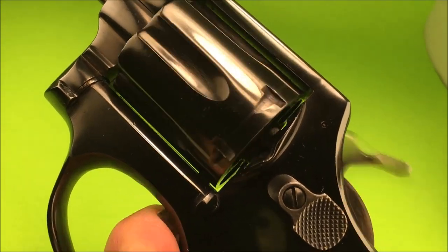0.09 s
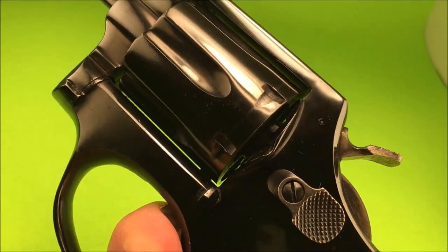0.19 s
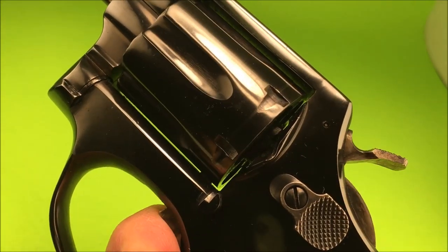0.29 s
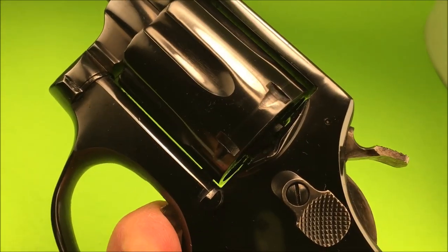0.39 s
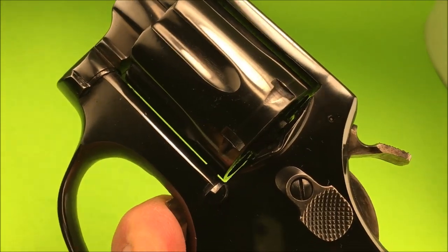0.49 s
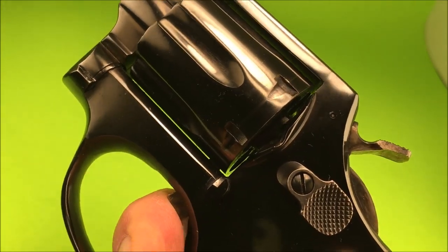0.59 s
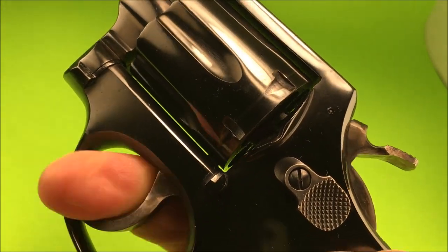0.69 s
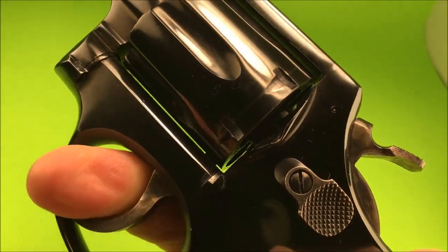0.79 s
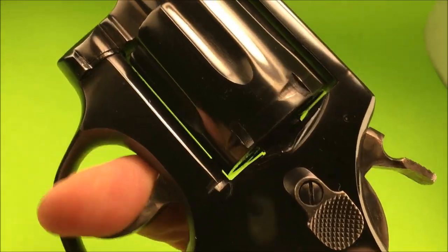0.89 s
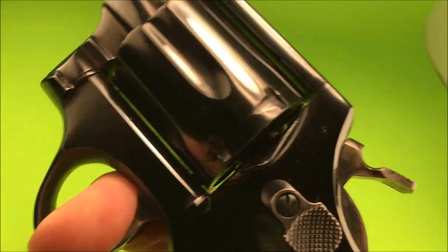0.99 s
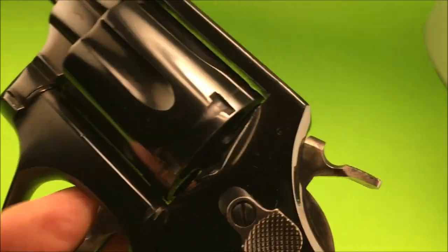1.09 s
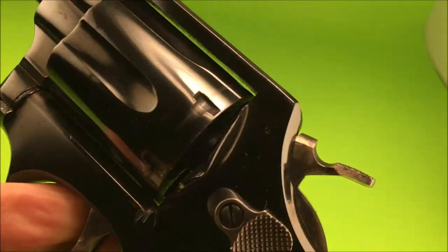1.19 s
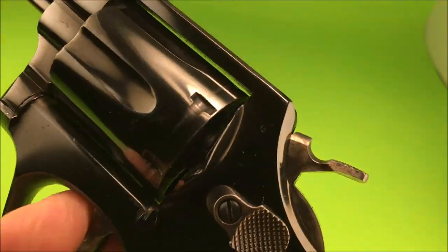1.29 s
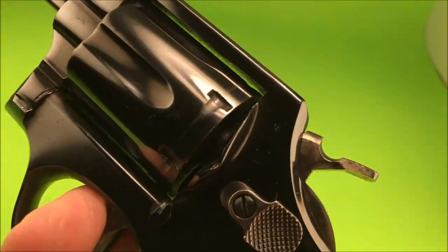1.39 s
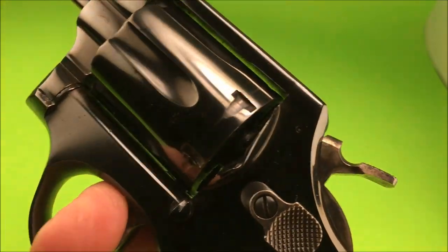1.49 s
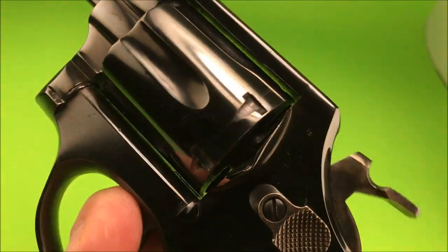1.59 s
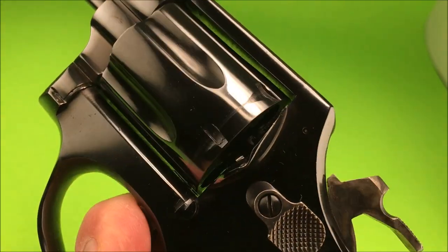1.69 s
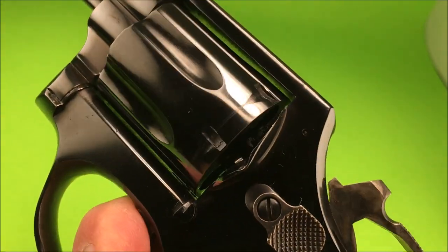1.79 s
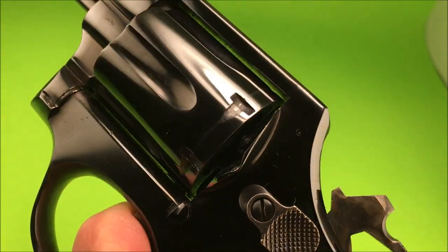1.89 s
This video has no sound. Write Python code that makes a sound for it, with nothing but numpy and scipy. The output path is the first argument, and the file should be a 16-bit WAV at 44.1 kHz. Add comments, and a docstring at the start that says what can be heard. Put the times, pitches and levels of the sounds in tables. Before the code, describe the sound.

A revolver handled close up in a small, quiet room with faint low rumble. A tiny tick, then at 0.2 s the hammer falls: a fast, very loud steel clatter with a short thump and thin hissy shimmer. Soft sliding follows; around 0.75-0.8 s the trigger snaps forward sharply. Light ticks come near 1.0 and 1.2 s, with a small clink, then near quiet, and crisp locking clicks at 1.7 s.

```python
"""A low steady rumble and one faint tick come first, in a small, quiet room; then a revolver is worked by hand.
After a brief slide the hammer falls with a clatter, a thump and a thin shimmer, and the trigger snaps forward.
A slow pull then slides the action, turns the cylinder and locks it with light ticks.
Contacts are decaying noise with frame modes, slides are gated grainy noise, thumps are damped sines.
The shimmer is narrow noise bands, the room a diffuse tail; the recorder's gain ducks after loud blows."""
import sys
import numpy as np
from scipy import signal
from scipy.fft import irfft
from scipy.io import wavfile
from scipy.ndimage import uniform_filter1d

SR = 44100
rng = np.random.default_rng(int(sys.argv[2]) if len(sys.argv) > 2 else 0)


def transcribe(u):
    """Save the signal u as a 16-bit wav file named by the first command-line argument.

    u: samples, shape (n,) or (channels, n), limited to [-1, 1]; the rate is SR.
    q: integer samples, one column per channel.
    """
    v = np.clip(np.atleast_2d(u).T, -1, 1)
    q = np.round(v * 32767).astype(np.int16)
    wavfile.write(sys.argv[1], SR, q)


N = 85995  # length in samples

# Steady low rumble, spectrum: pitch_hz, level_db
AIR_COLOUR = [(15, -31), (25, 0.5), (108, 0), (206, -3), (317, -12), (394, -10), (516, -24.5),
              (1100, -28.5), (1190, -27), (2000, -33.5), (2610, -36), (5430, -42), (6920, -42.5),
              (14800, -43), (16000, -54.5)]
AIR_DB = -54

# Light ticks of pawl, cylinder stop and sear:
# start_s, level_db, t60_s, tilt_db_per_octave, bass_db (shelf below about 1 kHz)
TICKS = [(0.0425, -52, 0.023, -5, 2), (0.6920, -50, 0.012, 6, 0), (0.7245, -52, 0.016, -6, -2),
         (0.7278, -55, 0.013, 0, 0), (0.9778, -40, 0.0093, -3, -30), (0.9878, -40, .007, -9, -4),
         (0.9965, -46.5, 0.01, 8, -4), (1.0135, -47.5, .012, -2, 4), (1.0368, -44, .022, -1, -29),
         (1.1840, -59, .012, 7, 12.5), (1.1912, -43.5, .015, 8, 7), (1.1955, -50.5, 0.014, -21, -10),
         (1.2080, -51, 0.013, -10, 4), (1.2128, -40, 0.017, 2.5, 4), (1.2513, -49, .018, 5.5, 14),
         (1.4770, -62, 0.023, -4, 1.5), (1.6160, -57.5, 0.0096, 3, 1), (1.6315, -63, .016, 4, 2),
         (1.6560, -57.5, .016, -8, 6), (1.7035, -46, .015, 6, 3), (1.7055, -32.5, 0.026, 1.5, -1),
         (1.7092, -44, 0.013, 8, 22), (1.7412, -47.5, 0.015, 11, 1), (1.7540, -45, .018, 0, 0),
         (1.7725, -49.5, 0.026, 6, -1.5)]
# Hammer let off, striking and bouncing: columns as for TICKS
HAMMER = [(0.1965, -27, 0.066, 2.94, -7.5), (0.2047, -17, 0.015, 2, -4.5), (0.2070, -14, 0.024, 1.5, -2.5),
          (0.2160, -10, .022, -0.44, -8.5), (0.2212, 1, 0.018, -2, 1.5), (0.2235, -3.5, 0.021, 1, 0),
          (0.2275, 2, 0.053, 2.5, -0.5), (0.2335, -6.5, .11, 4.5, -2)]
# Trigger returning and the lock snapping home: columns as for TICKS
RESET = [(0.7488, -22.5, 0.0086, 2, -15.5), (0.7532, -22.5, 0.02, -1.3, -16.5),
         (0.7740, -25, 0.029, -0.8, -4), (0.7915, -4.5, 0.013, -0.84, 3), (0.7983, -7.5, 0.014, -0.03, 0),
         (0.8003, -5, 0.021, -0.04, -6)]
# Spectra of the ticks, hammer blows and lock snaps: pitch_hz, level_db
TICK_COLOUR = [(350, -49), (600, -13), (1330, -12.5), (1610, -7.5), (2950, -1.5), (3730, -3), (4520, -12.5),
               (6460, -5.5), (7730, -16), (8270, -8), (10200, -19), (11300, -12.5), (16000, -29)]
HAMMER_COLOUR = [(150, -21.5), (250, -2.5), (319, -7.5), (662, -5), (1160, -15), (1260, -22), (1470, -14),
                 (1980, -10), (2280, -16), (3710, -7), (5440, -17.5), (6820, -11.5), (12800, -19),
                 (15200, -17.5), (16000, -23)]
RESET_COLOUR = [(120, -35.5), (200, -4.5), (696, -8.5), (1300, -19), (2020, -6), (2470, -14), (2700, -12.5),
                (3690, -3), (4680, -10), (6280, -2.5), (7540, -9.5), (9230, 2), (10300, -12), (11500, -2.5),
                (16000, -16.5)]
# Short resonances of the frame: pitch_hz, level_db (relative), t60_s
FRAME_MODES = [(2089, -5, 0.038), (2748, -8.5, 0.045), (3180, -6, 0.036), (3404, -8, 0.022),
               (3730, -12.5, 0.05), (4580, -11, .045), (6700, -16, 0.034), (6710, -10, 0.066),
               (7393, -13.5, .05), (8450, -11.5, 0.051), (8200, -14.5, 0.06), (9430, -18, 0.051),
               (11720, -16.5, .035)]
FRAME_DB = -6.5

# Spectrum of the room's tail: pitch_hz, level_db
ROOM_COLOUR = [(100, -9), (500, -6), (1500, 0), (4000, 1), (9000, -1), (12000, -6), (16000, -9)]
ROOM_T60_S, ROOM_DB, ROOM_BUILD_S = 0.23, -25, 0.0013

# Steel sliding on steel:
# start_s, length_s (until the fade-out), level_db, tilt_db_per_octave, grain (0-1)
SLIDES = [(0.173, 0.052, -62.5, -.5, .4), (0.427, .05, -52, 0.5, 0.12), (0.47, .21, -59, -1, 0.1),
          (0.727, 0.1, -54.5, 0, 0.2), (0.86, 0.35, -63, 0, 0.1), (0.948, 0.1, -62, 0, 0.1),
          (1.242, 0.1, -71, -4.5, 0.24), (1.53, 0.17, -74.5, -.5, .6), (1.691, 0.033, -52.5, 0, .5),
          (1.736, 0.034, -56, 1.5, 0.8)]
# Spectrum of the slides and of the wash behind the shimmer: pitch_hz, level_db
SLIDE_COLOUR = [(300, -4), (600, -4), (1000, -3.5), (1600, -3), (2900, -4), (3800, -4), (5000, -5.5),
                (8500, -9), (11000, -10), (16000, -16)]
SLIDE_FADE_S = 0.0071

# Blows and finger movements jolting gun and hand:
# start_s, pitch_hz, level_db (before rise and decay), t60_s
THUMPS = [(0.218, 176, 10, 0.06), (0.2188, 370, -4, 0.012), (0.2205, 479, 2, 0.021), (0.2212, 633, 7, .024),
          (0.2209, 1016, 4, 0.019), (0.2241, 59.07, 23.5, 0.06), (0.675, 62, -34, .09),
          (0.8003, 150, -22.5, 0.039), (0.8005, 413, -29, .025), (0.804, 55, -31, .07)]
THUMP_RISE_S = 0.0068

# Hammer and mainspring ringing on in clusters of close modes: pitch_hz, level_db (relative), t60_s
SPRING_MODES = [(1150, -9.5, .2), (2200, -9.5, 0.62), (3240, -7.5, 0.63), (3560, -6, 0.46),
                (4300, -7.5, 0.21), (6250, -4.5, 0.27), (6830, -0.5, 0.42), (8600, -3.5, 0.47),
                (9400, -5.5, .26), (10800, 0, 0.17), (11600, -3, 0.17), (13700, -7, .2), (14900, -3.5, 0.2)]
SPRING_S, SPRING_DB = 0.222, -30.5
SPRING_SPREAD = 0.04  # half-width of a cluster at half amplitude, as a fraction of its pitch
WASH_DB, WASH_T60_S = -24, 0.32

# The cylinder ringing as it is let go: pitch_hz, level_db (relative), t60_s
CYLINDER_MODES = [(1620, -4.5, 0.07), (2038, -3, 0.049), (2666, -0.5, 0.033), (3210, -4, 0.044),
                  (3720, 9, 0.017)]
CYLINDER_S, CYLINDER_DB = 1.2128, -39.5

# Recorder: ducking threshold, dB of ducking per dB above it, recovery and detector time constant
DUCK_FROM_DB, DUCK_SHARE, RECOVER_DB_PER_S, DETECT_S = -33.5, 0.58, 25.5, 0.04
LOW_CUT_HZ, TOP_HZ = 20, 15900


def undb(db):
    """Logarithmic level: 20 dB is a factor of ten in amplitude."""
    return 10 ** (np.asarray(db) / 20)


def unit(x):
    """Normalization of power: scale to rms 1."""
    return x / np.sqrt(np.mean(x ** 2) + 1e-20)


def fade(t, t60):
    """Exponential damping: the amplitude falls by 60 dB in t60 seconds."""
    return np.exp(-np.log(1000) * t / max(t60, 1e-3))


def add(out, start_s, x):
    """Superposition: mix x into out from a given time."""
    i = int(np.clip(round(start_s * SR), 0, N - 1))
    out[i:i + len(x)] += x[:N - i]


def noise(colour, tilt=0, bass_db=0, size=N):
    """Spectral shaping: random phases under a set spectrum give noise, here of rms 1."""
    f = np.maximum(np.fft.rfftfreq(size, 1 / SR), 1)
    hz, db = np.array(colour, float).T
    level_db = np.interp(np.log(f), np.log(hz), db)
    # the tilt turns about 4 kHz and is held level below 1 kHz
    level_db = level_db + tilt * np.log2(np.maximum(f, 1000) / 4000)
    level_db = level_db + bass_db / (1 + (f / 1000) ** 4)
    # falls away below the lowest point of the spectrum
    gain = undb(level_db) * np.minimum(f / hz[0], 1) ** 2 * (f < TOP_HZ)
    phases = np.exp(2j * np.pi * rng.random(len(f)))
    return unit(irfft(gain * phases, size))


def air():
    """Stationary noise: a low rumble of constant spectrum and level."""
    return undb(AIR_DB) * noise(AIR_COLOUR)


def contacts(table, colour, size=3072):
    """Impact excitation: a dense crack dies in milliseconds and leaves frame modes of the same colour ringing."""
    out, t = np.zeros(N), np.arange(size) / SR
    hz, mode_db, mode_t60 = np.array(FRAME_MODES).T
    modes = np.array([fade(t, t60) * np.exp(2j * np.pi * f * t) for f, t60 in zip(hz, mode_t60)])
    mode_db = FRAME_DB + mode_db + np.interp(hz, *np.array(colour).T)
    for start_s, level_db, t60, tilt, bass_db in table:
        crack = noise(colour, tilt, bass_db, size=size) * fade(t, t60)
        phases = np.exp(2j * np.pi * rng.random(len(hz)))
        struck = undb(mode_db + tilt * np.log2(hz / 4000)) * phases
        frame_ring = (struck[:, None] * modes).imag.sum(axis=0)
        add(out, start_s, undb(level_db) * (crack + frame_ring))
    return out


def light_ticks():
    """Weak impacts: pawl, cylinder stop and sear tick against their seats."""
    return contacts(TICKS, TICK_COLOUR)


def room(x, size=16384):
    """Reverberation as convolution: each sound is followed by a short, diffuse tail."""
    t = np.arange(size) / SR
    build = 1 - np.exp(-t / ROOM_BUILD_S)
    tail = noise(ROOM_COLOUR, size=size) * fade(t, ROOM_T60_S) * build
    tail = tail / np.sqrt(np.sum(tail ** 2))  # unit energy
    return undb(ROOM_DB) * signal.fftconvolve(x, tail)[:N]


def slides(size=16384):
    """Friction noise: sliding steel catches irregularly, so its hiss is grainy."""
    out, t = np.zeros(N), np.arange(size) / SR
    for start_s, length_s, level_db, tilt, grain in SLIDES:
        gate = np.clip(np.minimum(t, length_s - t + SLIDE_FADE_S) / SLIDE_FADE_S, 0, 1)
        roughness = unit(uniform_filter1d(rng.standard_normal(size), size=60))
        catches = unit(np.exp(grain * roughness))
        hiss = noise(SLIDE_COLOUR, tilt, size=size)
        add(out, start_s, undb(level_db) * gate * catches * hiss)
    return out


def hammer_fall():
    """Repeated impact: the hammer is let off, strikes and bounces."""
    return contacts(HAMMER, HAMMER_COLOUR)


def thumps():
    """Damped oscillation: the jolted gun and hand make heavily damped low swings."""
    out, t = np.zeros(N), np.arange(N // 8) / SR
    rise = 1 - np.exp(-t / THUMP_RISE_S)
    for start_s, hz, level_db, t60 in THUMPS:
        swing = np.sin(2 * np.pi * hz * t)
        add(out, start_s, undb(level_db) * rise * fade(t, t60) * swing)
    return out


def spring_shimmer(size=16384):
    """Beating of close modes: clusters shimmer over a wash of weaker, dense ones."""
    out, t = np.zeros(N), np.arange(size) / SR
    f = np.fft.rfftfreq(size, 1 / SR)
    for hz, level_db, t60 in SPRING_MODES:
        phases = np.exp(2j * np.pi * rng.random(len(f)))
        resonance = 1 / (1 + ((f / hz - 1) / SPRING_SPREAD) ** 2)
        cluster = unit(irfft(phases * resonance, size))
        add(out, SPRING_S, undb(SPRING_DB + level_db) * cluster * fade(t, t60))
    wash = noise(SLIDE_COLOUR, tilt=1.9, bass_db=-7.5, size=size)
    add(out, SPRING_S, undb(WASH_DB) * wash * fade(t, WASH_T60_S))
    return out


def trigger_reset():
    """Impact on return: the trigger comes forward and the lock snaps home."""
    return contacts(RESET, RESET_COLOUR)


def cylinder_clink():
    """Modal ringing: decaying sines at chance phases make the cylinder's short, lower clink."""
    out, t = np.zeros(N), np.arange(N // 8) / SR
    for hz, level_db, t60 in CYLINDER_MODES:
        mode = np.sin(2 * np.pi * (hz * t + rng.random()))
        add(out, CYLINDER_S, undb(CYLINDER_DB + level_db) * fade(t, t60) * mode)
    return out


def scene():
    """Superposition of sources: the steel and its room tail, the thumps and the rumble."""
    steel = light_ticks() + slides() + hammer_fall() + spring_shimmer() + trigger_reset() + cylinder_clink()
    # the thumps swing in the negative direction first and get no room tail
    return (air() + steel + room(steel) - thumps())[None]


def record(dry):
    """Automatic gain control: the gain ducks after loud sounds and recovers slowly; deepest bass and top are cut."""
    t = np.arange(N) / SR
    k = np.exp(-1 / (DETECT_S * SR))
    heard = signal.lfilter([1 - k], [1, -k], np.abs(dry[0]))
    heard_db = 20 * np.log10(heard + 1e-9)
    wanted_db = DUCK_SHARE * np.maximum(heard_db - DUCK_FROM_DB, 0)
    # a running maximum along a falling line limits how fast the gain recovers
    recovery_db = RECOVER_DB_PER_S * t
    duck_db = np.maximum.accumulate(wanted_db + recovery_db) - recovery_db
    low_cut = signal.butter(1, LOW_CUT_HZ, "high", fs=SR, output="sos")
    ducked = signal.sosfilt(low_cut, dry * undb(-duck_db))
    top_cut = signal.ellip(10, 0.2, 80, TOP_HZ, fs=SR, output="sos")
    return signal.sosfilt(top_cut, np.clip(ducked, -1, 1))


dry = scene()
out = record(dry)
transcribe(out)
```